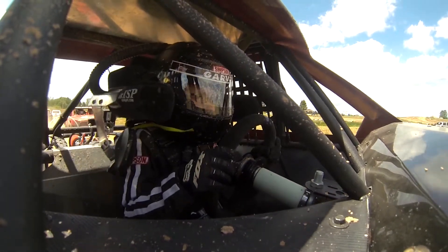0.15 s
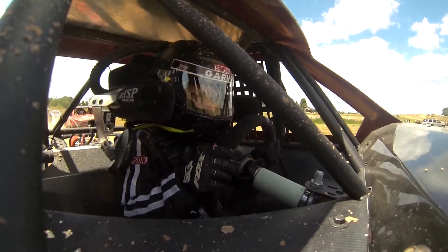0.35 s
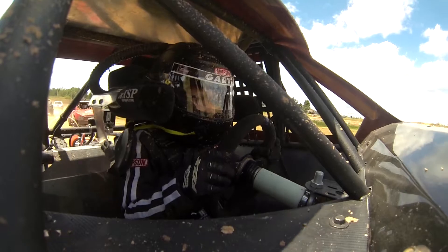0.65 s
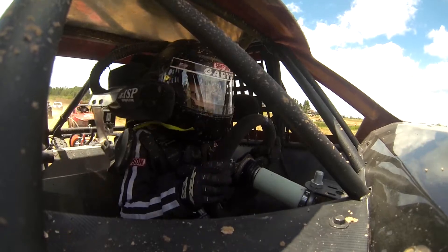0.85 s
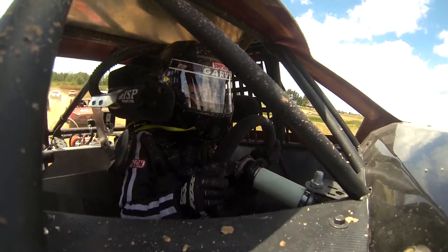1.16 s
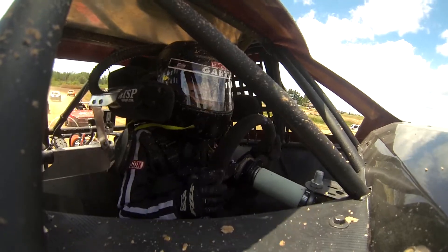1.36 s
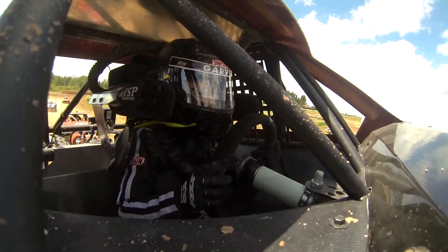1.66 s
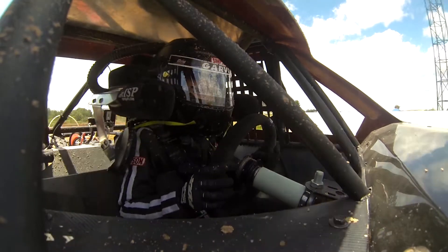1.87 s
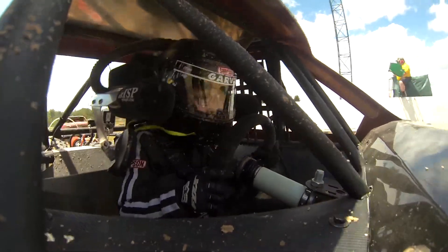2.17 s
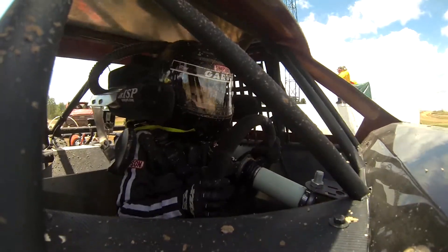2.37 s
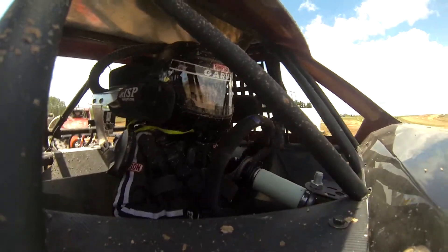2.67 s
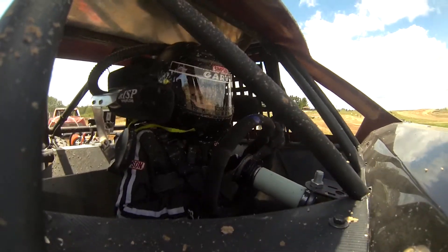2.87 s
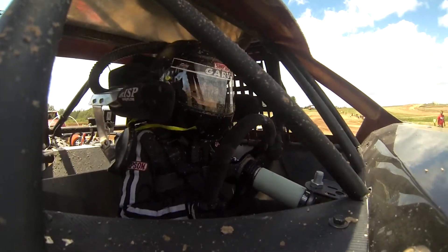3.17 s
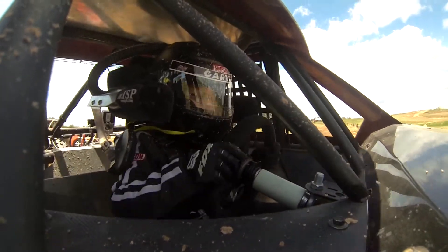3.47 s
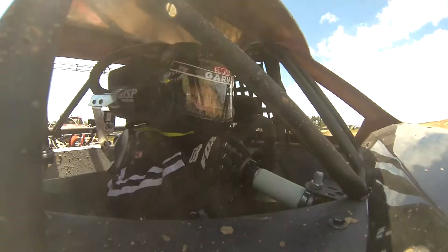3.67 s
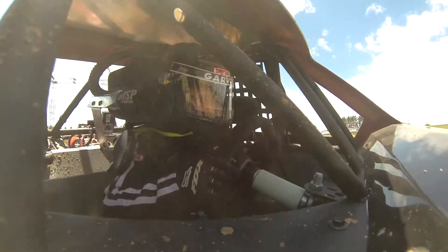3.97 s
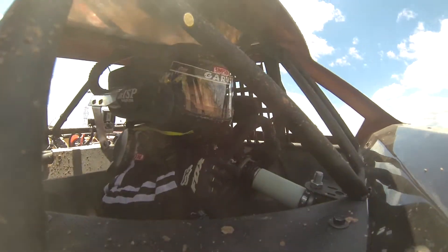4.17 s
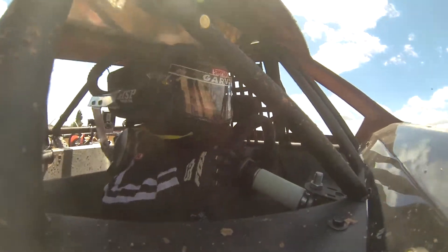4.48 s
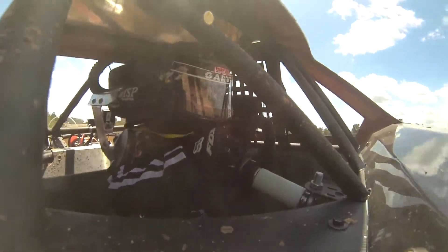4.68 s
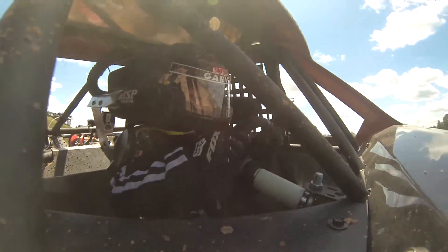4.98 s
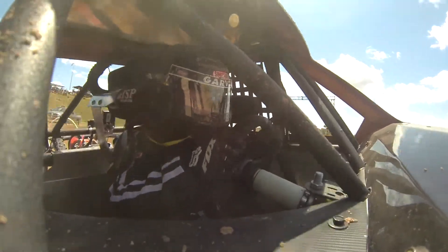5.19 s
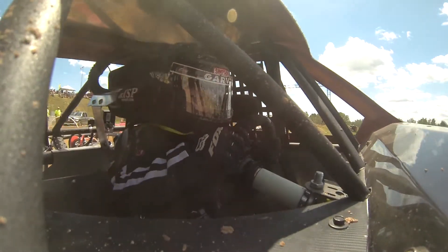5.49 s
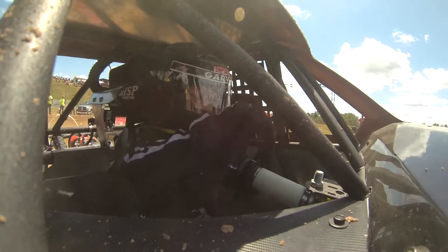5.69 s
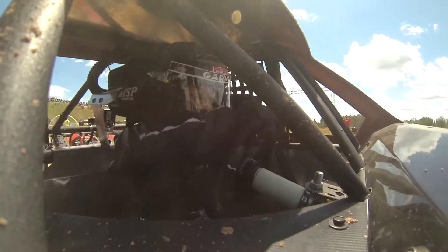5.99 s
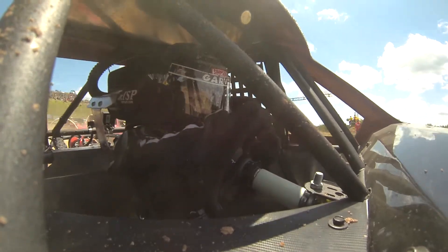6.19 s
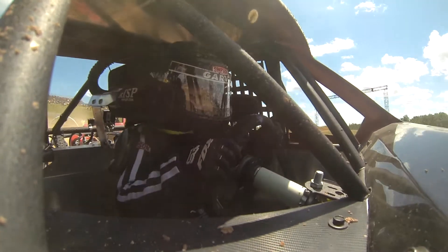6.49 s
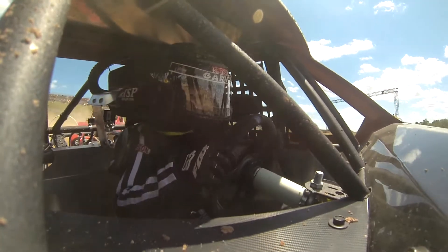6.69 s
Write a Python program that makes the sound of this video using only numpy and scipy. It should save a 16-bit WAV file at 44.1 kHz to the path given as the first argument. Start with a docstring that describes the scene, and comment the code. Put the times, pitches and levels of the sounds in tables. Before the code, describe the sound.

A small racing engine drones low and steady right behind the driver of a caged off-road kart, with panel rattle, metallic clatter and faint thin whines. Around two seconds it stutters and dips, recovers, then bogs down into a slow, rough, chugging growl before pulling back up. The rest is a fairly even boom with small wavers. Close, boxy microphone in a closed housing on the cage, outdoors, no distinct echo.

```python
"""A small racing engine booms and roars from the first moment, behind the seat of an off-road kart.
The boom is a sine at the firing rate with overtones; panels and valve gear are pulsing noise shaped by resonances.
A camera in a closed housing hangs on the cage: its mount swings near 32 Hz and makes the boom shudder.
Thin wavering sine whines come and go, the wheels rumble in low noise, and grit ticks in short noise cracks."""
import sys
import numpy as np
from scipy.fft import rfft, irfft, next_fast_len
from scipy.io import wavfile
from scipy.ndimage import uniform_filter1d, map_coordinates

SR = 44100
rng = np.random.default_rng(int(sys.argv[2]) if len(sys.argv) > 2 else 0)


def store_pcm(level_fs):
    """Save levels as 16-bit WAV."""
    pcm = np.round(np.clip(level_fs, -1, 1) * 32767).astype(np.int16)
    wavfile.write(sys.argv[1], SR, np.atleast_2d(pcm).T)


N = 301644  # length [samples]

# wheels on dirt, tone color: (frequency [Hz], relative level [dB])
RUMBLE_COLOR = [(8, -26), (20, -1.5), (50, 0), (90, -13), (140, -15.5), (300, -57), (1000, -100)]
# rough ground: (time [s], mount swing [dB], rumble [dB])
GROUND = [(0, -39, -31), (1.9, -42, -34), (2.1, -36, -39), (3.05, -42, -45.5), (3.3, -25.5, -43),
          (4.05, -20.5, -28), (4.35, -37, -46.5), (6.84, -35, -42.5)]
# bumps, added to the ground: (time [s], swing change [dB], rumble change [dB], half-width [s])
BUMPS = [(2.39, 5, 14, .07), (2.8, 4.5, 1, .15), (3.44, 4, 0, 0.15), (3.63, -1, 0, 0.036),
         (3.96, 4.5, 0, .1), (4.6, 6, 0, .15), (5.03, 14, 8, 0.1), (5.24, 11, 0, 0.052),
         (5.56, 7, 2.5, 0.066), (6.07, 10.5, 2, .17)]
# small stones: (time [s], relative level [dB], center [Hz], width [Hz])
GRIT = [(1.932, -48, 8000, 8000), (2.312, -50, 8070, 7000), (3.107, -55, 11940, 3030),
        (3.2195, -51, 9070, 8850), (4.473, -30.5, 4240, 909), (5.598, -33, 3660, 501.5)]
# thin whines, one list for each: (time [s], pitch [Hz], level [dB])
WHINES = [
    [(0, 1029, -44), (.45, 1027, -39), (.65, 1018, -37), (.9, 1029, -30), (1.15, 995, -38),
     (1.3, 1003, -28), (1.5, 980, -36), (1.64, 960, -29)],
    [(.15, 940, -37), (.5, 928, -32), (.66, 934, -34)],
    [(1.06, 918, -29), (1.13, 914, -23), (1.2, 925, -42), (1.26, 935, -25), (1.4, 904, -32),
     (1.53, 920, -27)],
    [(2.2, 913.3, -28), (2.27, 945, -22.5), (2.5, 923.5, -27.5), (2.6, 928, -34), (2.72, 951, -32),
     (2.9, 926, -28), (3.0, 918, -39)],
    [(6.11, 916.5, -27), (6.28, 895, -38), (6.42, 911, -28.5), (6.6, 904, -30), (6.66, 870, -43),
     (6.84, 886, -35)],
    [(0, 2825, -30.5), (.22, 2820, -44), (.36, 2835, -30.5), (.5, 2857, -40), (.65, 2846, -35.5),
     (.87, 2850, -36.5), (1.05, 2860, -43)],
    [(1.1, 3140, -40), (1.15, 3220, -37), (1.24, 3230, -47), (1.38, 3180, -40), (1.55, 3090, -43),
     (1.7, 3030, -40), (1.83, 3120, -34), (1.97, 3070, -35)],
]
# resonances of the closed housing: (center [Hz], width [Hz], relative level [dB])
HOUSING_MODES = [(2620, 1040, -5.5), (2848, 142, 0), (3013, 266, 1.5), (3195, 180, -3), (3550, 1200, -17),
                 (3900, 200, -35.5), (4196, 630, -14), (4667, 246, -12), (5040, 580, -23),
                 (5280, 350, -15.5), (6190, 180, -31.5), (6520, 410, -29.5), (7380, 220, -26),
                 (8600, 900, -38)]
# airborne rasp, tone color: (frequency [Hz], relative level [dB])
RASP_COLOR = [(3000, -65.5), (5500, -34.5), (6500, -34.5), (8800, -36), (10000, -40.5), (12500, -42),
              (14200, -52), (15000, -66.5)]
# resonances of the sheet panels: (center [Hz], width [Hz], relative level [dB])
PANEL_MODES = [(228, 37, -6), (259, 82, -8.5), (464.3, 41.4, -9.5), (717, 42, -8.5), (830.6, 97, -7.5),
               (901.5, 130, -2), (1106, 211, -0.5), (1425.4, 80, -3), (1540, 360, -7.5), (1751, 110, -6),
               (2025, 400, -8.5)]
# loose sheets that join in under load: (center [Hz], width [Hz], relative level [dB])
BUZZ_MODES = [(1126, 24, 5), (883, 36, -10.5), (1414, 31, -9), (4600, 150, -26)]
# dull roar of the tube frame, tone color: (frequency [Hz], relative level [dB])
THUD_COLOR = [(20, -38.5), (60, -6.5), (105, 6.5), (140, -13.5), (180, -14.5), (400, -20.5), (650, -18.5),
              (1300, -27), (3000, -91.5)]
# engine load: (time [s], panel roar [dB], airborne rasp before its trim [dB])
LOAD = [(0, -25.5, -54), (1.1, -25.5, -55), (1.6, -26.5, -55.5), (1.88, -21, -51.5), (1.95, -21.5, -54.5),
        (2.0, -28, -65), (2.12, -32.5, -67), (2.27, -24.5, -66), (2.35, -20, -50), (2.63, -32, -61.5),
        (2.84, -29.5, -55.5), (3.04, -32.5, -66.5), (3.12, -25.5, -62.5), (3.32, -18.5, -60),
        (3.5, -20, -59), (3.66, -16, -57), (3.95, -19, -60.5), (4.04, -21.5, -53), (4.4, -33, -60),
        (4.57, -34, -63.5), (4.72, -29, -57), (4.86, -31, -58.5), (4.99, -27.5, -55.5),
        (5.42, -33.5, -61.5), (5.5, -28.5, -55.5), (5.69, -35, -61.5), (6.1, -29, -55), (6.27, -31, -56),
        (6.52, -28.5, -54.5), (6.84, -30, -55.5)]
# engine speed: (time [s], firing rate [Hz])
ENGINE_SPEED = [(0.0, 108.9), (1.1, 107.6), (1.25, 106.1), (1.65, 106.3), (1.85, 113.5), (1.96, 107.2),
                (2.1, 99.96), (2.2, 101.8), (2.28, 86), (2.35, 89.82), (2.46, 95.6), (2.8, 105.3),
                (2.9, 105.4), (3.11, 92.86), (3.31, 82.1), (3.54, 74.47), (3.75, 74.5), (3.9, 71.8),
                (4.1, 89.1), (4.3, 99.6), (4.71, 105.3), (4.89, 104.3), (5.09, 108.7), (5.35, 100.8),
                (5.49, 109.9), (5.7, 100.4), (6.04, 107.8), (6.84, 107.2)]
# overtones: (multiple of the firing rate, relative level [dB])
OVERTONES = [(1.5, -35), (2, -24.5), (2.5, -36.5), (3, -29.5), (3.5, -35.5), (4, -38.5), (5, -34), (6, -32)]
# cage resonances that lift passing overtones: (center [Hz], width [Hz], relative gain [dB])
CAGE_MODES = [(203.3, 18, -8.5), (224.9, 18, -2), (271.7, 12, -3.5), (397, 30, -11.5)]
# brief dips of the firing tone: (time [s], depth [dB], half-width [s])
DROPOUTS = [(1.85, 1.5, 0.024), (1.92, 2.5, 0.015), (2.19, 11, 0.016), (2.245, 15, 0.02), (2.295, 7, 0.017),
            (2.38, 3, 0.018), (3.115, 8.5, 0.042), (3.19, 4, 0.035), (3.56, 3, .03), (3.85, 4, .015),
            (3.89, 14, 0.017), (4.08, 6, 0.012), (4.68, 3, 0.069), (5.08, 4, .03), (5.48, 10, 0.034),
            (6.0, 2, 0.081)]

LEAD = 0.72  # share of a firing between a rattle and the next boom
TOP_HZ = 15000
TONE_DB, TONE_PER_HZ_DB = -13.5, -0.19  # firing tone up to 104 Hz; its change for each Hz above that
LUG_LOSS_DB, LUG_FLUTTER_DB = 10, 2.5  # loss and flutter of the tone when the engine lugs (labors slowly)
CLATTER_DB, CLATTER_GROWS = -34.5, 1.09  # clatter at a roar of -25 dB; dB gained per dB of roar
CLATTER_LUG_DB = -5.5  # change of the clatter when lugging


def amp(db):
    """Turn decibels into a gain."""
    return 10 ** (np.asarray(db) / 20)


def unit(x):
    """Scale a sound to an average (rms) level of 1."""
    return x / np.sqrt(np.mean(x ** 2) + 1e-20)


def curves(rows):
    """Join the rows with straight lines: one value per sample for each column after the time."""
    s, *cols = np.transpose(rows)
    return [np.interp(np.arange(N) / SR, s, c) for c in cols]


def wobble(rate):
    """A smooth random curve through `rate` random points a second."""
    knots = rng.standard_normal(int(N * rate / SR) + 4)
    return map_coordinates(knots, [np.arange(N) * rate / SR])


def humps(s, height, half_width_s):
    """Add up bell-shaped humps in time."""
    t = np.arange(0, N / SR, .002)  # a coarse grid is enough for slow humps
    bells = np.exp(-((t[:, None] - s) / half_width_s) ** 2)
    return np.interp(np.arange(N) / SR, t, bells @ height)


def filtered(x, response):
    """Make each frequency of x louder or softer by the response."""
    m = next_fast_len(N + SR // 2)
    spectrum = rfft(x, m) * response(np.fft.rfftfreq(m, 1 / SR))
    return irfft(spectrum, m)[..., :N]


def slope(points):
    """A response drawn through (frequency [Hz], level [dB]) points on a log axis."""
    f, db = np.transpose(points)
    return lambda hz: amp(np.interp(np.log(hz + 1), np.log(f), db))


def modes(rows, order=2):
    """Resonances whose powers add; a higher order makes their sides steeper."""
    def response(f):
        return np.sqrt(sum((amp(db) / (1 + np.abs(2 * (f - c) / w) ** order)) ** 2 for c, w, db in rows))
    return response


def rung(gain, response):
    """Fresh noise shaped in time by a gain, then in color by a response, at rms 1."""
    return unit(filtered(gain * rng.standard_normal(N), response))


def beat(cycles, depth_db, scatter_db):
    """A gain that swells quickly once a cycle and sinks until the next; every cycle has its own size."""
    sizes = rng.standard_normal(int(cycles[-1]) + 1)[cycles.astype(int)]
    sawtooth = cycles % 1 - .5
    gain = amp(uniform_filter1d(scatter_db * sizes - depth_db * sawtooth, size=70))
    # keep the average power even, so that only the pulsing is left
    return gain / np.sqrt(np.abs(uniform_filter1d(gain ** 2, size=SR // 6)))


def wheel_rumble(level_db):
    """Wheels on dirt make a low noise whose level wanders."""
    return amp(level_db + 2.2 * wobble(5.3)) * rung(1, slope(RUMBLE_COLOR))


def grit():
    """Small stones tick on the body: each is a short, fading noise crack with its own color."""
    out, t = np.zeros(N), np.arange(N) / SR
    for s, db, hz, width_hz in GRIT:
        fading = amp(db + 9.0 - 60 * np.abs(t - s) / 0.041)  # falls 60 dB in 0.041 s
        crack = (t >= s) * fading * rng.standard_normal(N)
        out += filtered(crack, modes([(hz, width_hz, 0)], order=4))
    return out


def whine():
    """Thin sine tones whose pitch trembles at random, which blurs them."""
    out, t = np.zeros(N), np.arange(N) / SR
    for rows in WHINES:
        hz, db = curves(rows)
        start, end = rows[0][0], rows[-1][0] + 0.055
        fade = np.clip(np.minimum(t - start, end - t) / 0.02, 0, 1)
        turns = np.cumsum(hz * (1 + .008 * wobble(45))) / SR
        out += fade * amp(db + 1.6 * wobble(25)) * np.sin(2 * np.pi * turns)
    return out


def mount(level_db):
    """The ground kicks the camera arm, which swings at its own low resonance."""
    hz = 32 + 1.818 * wobble(6)
    size = np.sqrt(2) * amp(level_db + 1.3 * wobble(14))  # root 2 turns rms into peak
    return size * np.sin(2 * np.pi * np.cumsum(hz) / SR)


def valve_gear(blows, turns, clatter_db, rasp_db):
    """Clatter rings the housing at every firing; the airborne rasp comes once a turn, every second firing."""
    clatter = amp(clatter_db) * rung(blows, modes(HOUSING_MODES, order=3))
    rasp = amp(rasp_db - 1.0 + 1.1 * wobble(6)) * rung(turns, slope(RASP_COLOR))
    return clatter + rasp


def panels(cycles, blows, level_db):
    """Firings and a sharp knock each turn ring the sheets; the tube frame adds a dull, wandering roar."""
    roar = amp(level_db) * rung(blows, modes(PANEL_MODES))
    # one click for every two firings, slightly uneven in time
    knocks = np.diff(np.floor(cycles / 2 + 0.012 * wobble(40)), prepend=0)
    knocking = amp(level_db - 18.0) * unit(filtered(knocks * blows, modes(PANEL_MODES)))
    # loose sheets gain over twice as many dB as the roar, the frame about half
    buzz = amp(2.14 * level_db + 10.5) * rung(blows, modes(BUZZ_MODES))
    frame = amp(0.53 * level_db - 17.0 + 2.0 * wobble(8.9)) * rung(1, slope(THUD_COLOR))
    return roar + knocking + buzz + frame


def firing(rate_hz, cycles, tone_db, load_db):
    """Firing tone plus overtones, which grow with load and swell where they cross a cage resonance."""
    tone = amp(tone_db + 3 + 0.31 * wobble(24)) * np.sin(2 * np.pi * cycles)  # 3 dB turns rms into peak
    for multiple, db in OVERTONES:
        lift = amp(-18.5) + modes(CAGE_MODES)(multiple * rate_hz)
        level = amp(db + 0.36 * (load_db + 20.0) + 1.8 * wobble(15))
        tone += lift * level * np.sin(2 * np.pi * multiple * cycles)
    return tone


def scene():
    """Ground, whines, grit and engine add up at one microphone."""
    # the ground
    mount_db, rumble_db = curves(GROUND)
    s, kick_db, thump_db, half_width_s = np.transpose(BUMPS)
    rumble = wheel_rumble(rumble_db + humps(s, thump_db, half_width_s))
    swing = mount(mount_db + humps(s, kick_db, half_width_s) + 2.3 * wobble(6.8))

    # the engine's speed and levels
    rate_hz, = curves(ENGINE_SPEED)
    panel_db, rasp_db = curves(LOAD)
    cycles = np.cumsum(rate_hz) / SR  # firings so far
    rattle_cycles = cycles + LEAD
    lugging = np.clip((100 - rate_hz) / 25, 0, 1)  # at low speed firings stand apart and grow uneven
    tone_db = TONE_DB + TONE_PER_HZ_DB * np.maximum(rate_hz - 104, 0) - humps(*np.transpose(DROPOUTS))
    tone_db += lugging ** 2 * (LUG_FLUTTER_DB * wobble(30) - LUG_LOSS_DB)
    clatter_db = CLATTER_DB + CLATTER_GROWS * (panel_db + 25) + CLATTER_LUG_DB * lugging

    # its pulses: blows at each firing, turns at every second one
    blows = beat(rattle_cycles, depth_db=2.0 + 2.9 * lugging, scatter_db=0.81 + 0.8 * lugging)
    blows *= amp(0.57 * wobble(11))
    turns = beat(rattle_cycles / 2, depth_db=12 - 4.2 * lugging, scatter_db=1.4)

    engine = valve_gear(blows, turns, clatter_db, rasp_db)
    engine += panels(rattle_cycles, blows, panel_db)
    boom = firing(rate_hz, cycles, tone_db, panel_db)
    coupling = 1 + 1.28 * swing  # the swinging arm tightens and loosens the boom's path through the frame
    return (rumble + grit() + whine() + swing + engine + coupling * boom)[None]


def record(dry):
    """The camera keeps only what lies below its band limit."""
    return filtered(dry, lambda hz: hz < TOP_HZ)


dry = scene()
out = record(dry)
store_pcm(out)
```